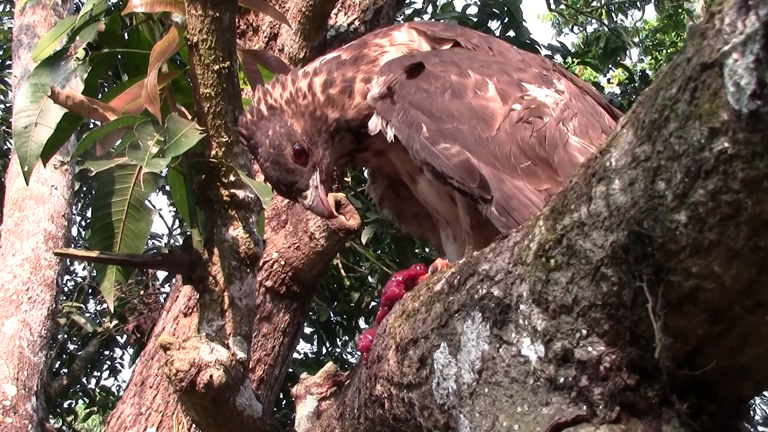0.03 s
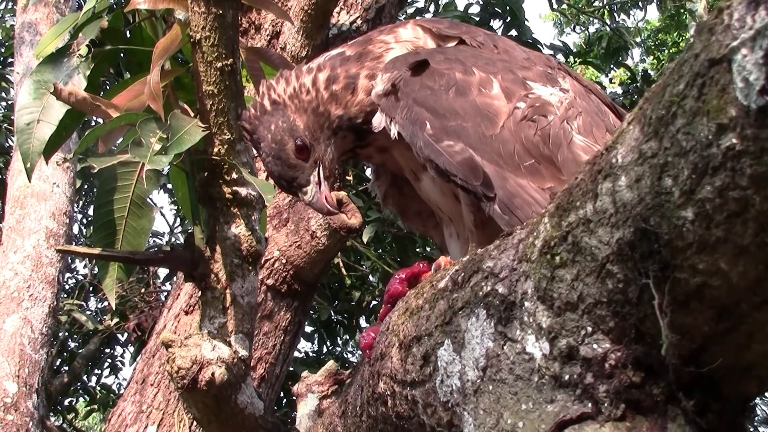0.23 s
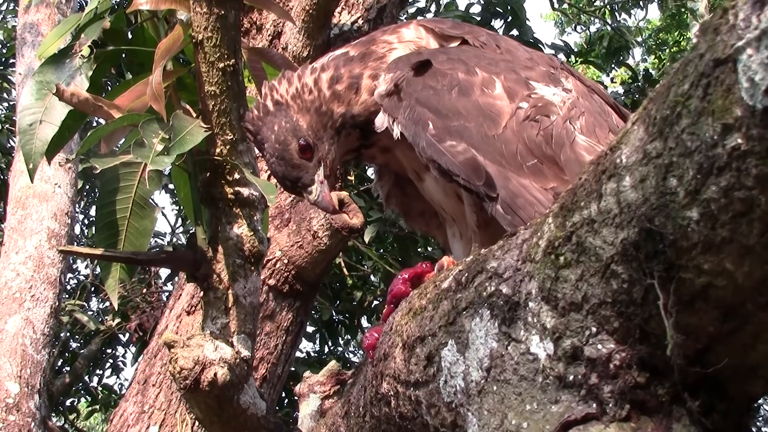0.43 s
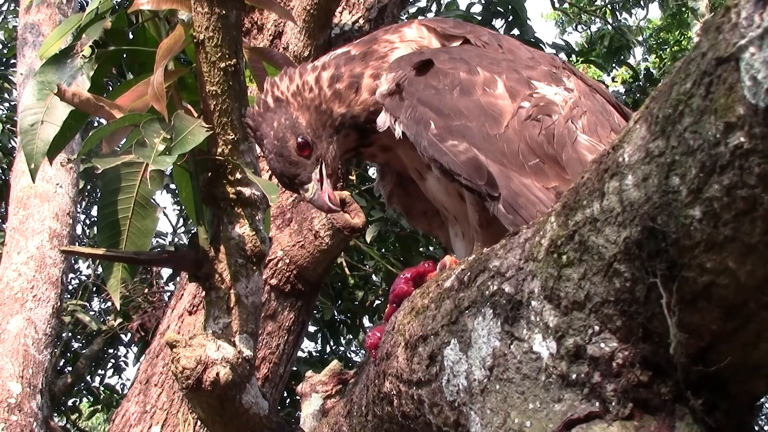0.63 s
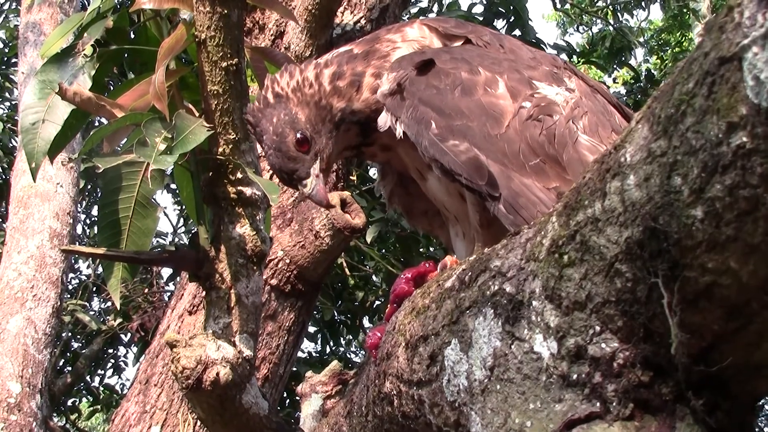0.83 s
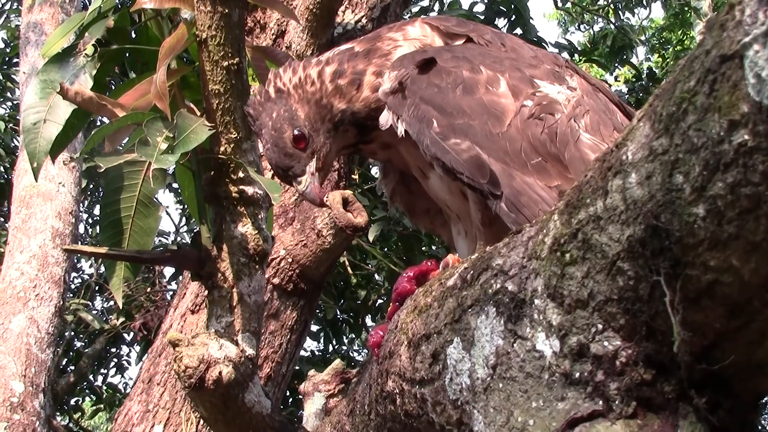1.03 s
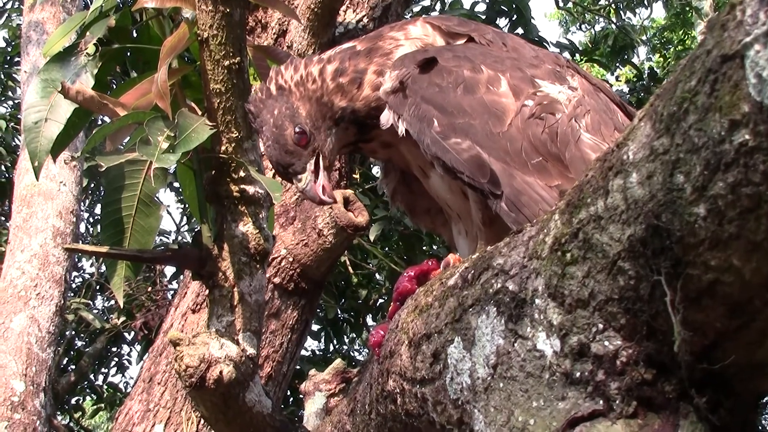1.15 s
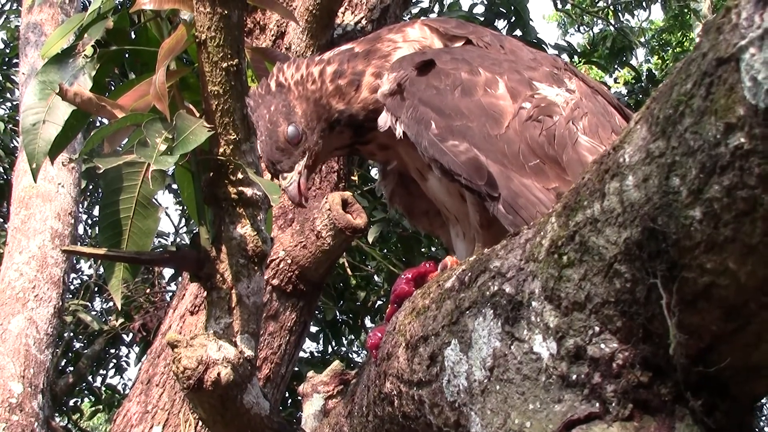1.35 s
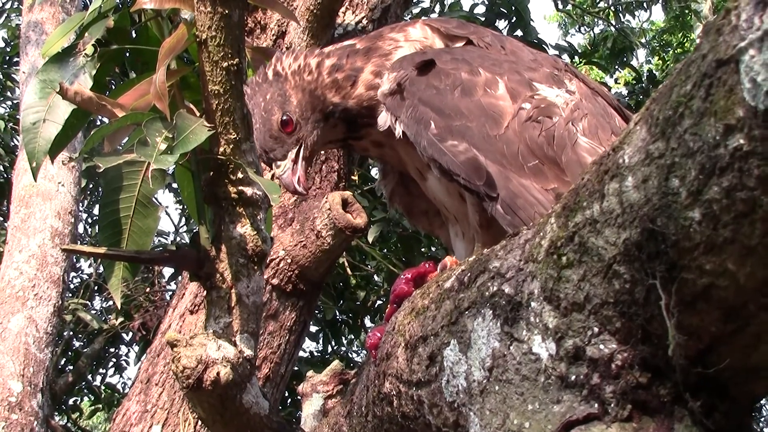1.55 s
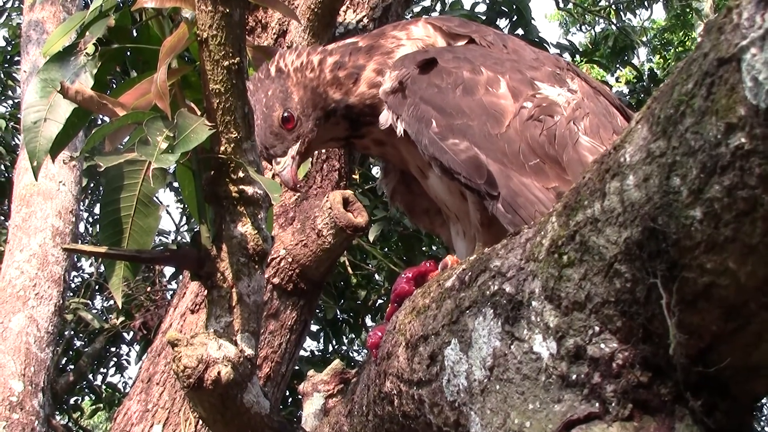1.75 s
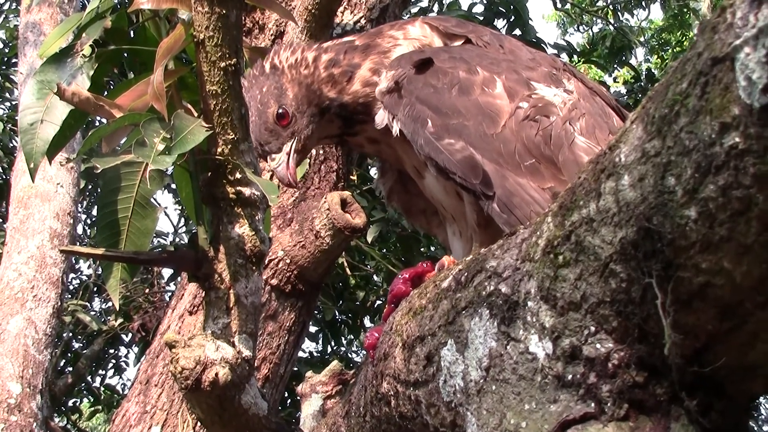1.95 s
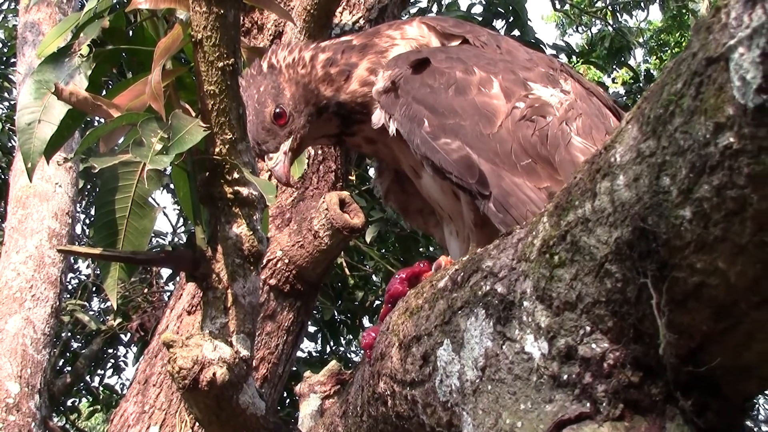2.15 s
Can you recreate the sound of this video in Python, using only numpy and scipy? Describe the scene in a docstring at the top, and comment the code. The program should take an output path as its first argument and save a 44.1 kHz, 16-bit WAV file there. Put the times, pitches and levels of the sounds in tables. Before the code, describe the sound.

A nearby bird of prey gives five short, harsh calls between about 0.2 and 1 second, the first one softer. Each rises and falls in pitch, turns raspy at the top and echoes briefly in the forest. Five faint, sharp ticks come roughly every half second from 0.3 to 2 seconds, each slightly louder. A quiet distant rumble, soft hiss and low drone continue throughout.

```python
"""A quiet far rumble, a soft hiss and a low drone are there from the start.
Soon a bird of prey on a nearby branch gives five harsh calls, each echoing briefly in the forest.
Each call rises and falls in pitch: the two sides of the bird's voice organ, the syrinx, start
together, split and turn raspy at the top, then rejoin. Faint, sharp ticks begin after the first
call and go on, a little louder each time, after the bird has stopped."""
import sys
import numpy as np
from scipy import signal
from scipy.fft import rfft, irfft, next_fast_len
from scipy.io import wavfile
from scipy.ndimage import map_coordinates

SR = 44100
rng = np.random.default_rng(int(sys.argv[2]) if len(sys.argv) > 2 else 0)


def dump_mix(stems):
    """Bounce the given channels to the path in sys.argv[1] as a 16-bit WAV at rate SR."""
    frames = np.atleast_2d(stems).T  # one column per channel
    limited = np.clip(frames, -1, 1)  # hard clip at full scale
    pcm = np.round(limited * 32767).astype(np.int16)
    wavfile.write(sys.argv[1], SR, pcm)


N = 97020

# background noise that both ears share: frequency_hz, gain_db
AIR_SHARED = [(12, -26), (24, -3), (45, -9), (58, -0.5), (80, -6), (120, -5), (160, -10), (210, -8),
              (420, -11), (880, -18.5), (2000, -23.5), (12000, -36.5), (15500, -44)]
# background noise that differs between the ears: frequency_hz, gain_db
AIR_SPREAD = [(12, -58), (20, -24), (157, -4), (202, -14), (232, -4), (372, -7.5), (416, -7), (788, -13),
              (3000, -25), (15500, -36)]
# slow swell of the background: time_s, rumble_db, hiss_db
AIR_LEVELS = [(0, 1, -1), (.45, -3, -1), (.7, -0.5, -1.5), (1.1, -0.5, -1), (1.599, -0.5, -1),
              (2.2, .5, -1)]
# tones of the far drone: pitch_hz, level_db
DRONE_TONES = [(54, -58.5), (210, -67.5)]
# the calls (a ratio above 1 makes the throat or beak ring higher):
# start_s, length_s, level_db, top_pitch_hz, low_voice_hz, low_voice_db, throat_ratio, beak_ratio, treble_db
CALLS = [(0.223, 0.048, -32.5, 752.3, 760, -14.5, 1.035, 0.98, 0.5),
         (0.339, 0.085, -28.5, 871.5, 728.3, 0, 1.032, 0.998, 1),
         (0.507, .104, -26, 1080, 694.2, 1.5, 1.032, 0.99, 4.5),
         (0.706, .108, -27, 1099, 697.4, 0.5, 1.028, 1.03, 4.5),
         (0.914, 0.11, -27.5, 1100, 698.4, 0.5, 1, 1.043, 4.5)]
# the darker tone of the low voice: frequency_hz, gain_db
LOW_VOICE_COLOUR = [(680, 1), (1400, 0), (2100, 2), (2700, -2.5), (3500, -5), (7000, -1)]
# how the throat rings: frequency_hz, gain_db
THROAT_COLOUR = [(350, -38), (680, -22.5), (1000, -28), (1400, -24), (1700, -9), (1950, -2), (2200, 1),
                 (2400, -1), (2650, -5), (3050, -6), (3500, -11), (3950, -24), (4800, -33), (7000, -58)]
# how the throat's tone changes while the beak is shut: frequency_hz, gain_db
SHUT_BEAK_COLOUR = [(1700, -1), (2200, 0), (2550, -9), (2850, 0), (3080, 8), (3500, 1), (4400, -4)]
# how the open beak rings: frequency_hz, gain_db
OPEN_BEAK_COLOUR = [(4700, -45), (5550, -21.5), (5950, -20.5), (6400, -12), (6850, -18), (7500, -29),
                    (8500, -38), (9900, -29.5), (10500, -40.5), (11800, -50), (13500, -46), (16000, -56)]
# time the forest echo takes to fade by 60 dB: frequency_hz, fade_s
ECHO_FADE = [(500, 0.15), (2200, 0.79), (3200, 0.66), (6500, 0.79), (12000, 0.43)]
# what the forest sends back: frequency_hz, gain_db
FOREST_COLOUR = [(700, -4), (1400, 6), (1780, 1), (2080, -5.5), (2450, 1.5), (3000, -.5), (3500, -4),
                 (4400, 4), (5500, 0), (6700, -4.5), (8500, 1), (12000, 1)]
# the ticks: start_s, level_db
TICK_TIMES = [(.2885, -39.5), (.6527, -38), (1.1411, -37), (1.5551, -33), (2.0522, -29.5)]
# the bright tone of a tick: frequency_hz, gain_db
TICK_BRIGHTNESS = [(2000, -18), (7000, -6), (11000, 0), (15500, 0)]

TOP_HZ = 15830  # highest frequency kept


def amp(db):
    """Turn decibels into a number to multiply by."""
    return 10 ** (np.asarray(db) / 20)


def unit(x):
    """Scale a sound to an average power of 1."""
    return x / np.sqrt(np.mean(x ** 2) + 1e-20)


def along(points, hz):
    """Read between the rows of a frequency table, with octaves evenly spaced."""
    row_hz, values = np.transpose(points)
    return np.interp(np.log(hz + 1), np.log(row_hz + 1), values)


def wobble(rate, size):
    """A smooth curve through `rate` random values a second."""
    return map_coordinates(rng.standard_normal(4096), [np.arange(size) * rate / SR], mode="wrap")


def filtered(x, response):
    """Turn each frequency up or down by response(hz)."""
    size = next_fast_len(x.shape[-1] + 8192)
    return irfft(rfft(x, size) * response(np.fft.rfftfreq(size, 1 / SR)), size)[..., :x.shape[-1]]


def coloured(x, points):
    """Shape a sound's tone with a table of frequency_hz, gain_db."""
    return filtered(x, lambda hz: amp(along(points, hz)))


def stereo(shared, spread):
    """Make left and right from what they share and what sets them apart."""
    return np.array([shared + spread, shared - spread])


def background():
    """Noise split into far rumble and soft hiss, each swelling slowly."""
    shared = amp(-50) * unit(coloured(rng.standard_normal(N), AIR_SHARED))
    spread = amp(-56.5) * unit(coloured(rng.standard_normal(N), AIR_SPREAD))
    air = stereo(shared, spread)
    rumble = filtered(air, lambda hz: 1 / (1 + (hz / 350) ** 2))  # mostly below 350 Hz
    times, *levels = np.transpose(AIR_LEVELS)
    rumble_gain, hiss_gain = [amp(np.interp(np.arange(N) / SR, times, db)) for db in levels]
    return rumble_gain * rumble + hiss_gain * (air - rumble)


def drone(waver_hz=1.97, waver_db=1.0):
    """Two far, low tones that waver in pitch and loudness."""
    out = np.zeros(N)
    for hz, db in DRONE_TONES:
        phase = 2 * np.pi * np.cumsum(hz + waver_hz * wobble(7.8, N)) / SR
        out += amp(db) * unit(np.sin(phase) * amp(-waver_db * wobble(7.16, N)))
    return out


def membrane(pitch, rough, lag_rad=.45, flutter_db=2.2):
    """One side of the syrinx makes uneven pulses and lets a puff of air through once a cycle."""
    n = len(pitch)
    pitch = pitch * (1 + (.008 + .036 * rough) * wobble(450, n))  # a rough voice shakes more
    phase = 2 * np.pi * np.cumsum(pitch) / SR
    harmonic = np.arange(1, 36)[:, None]  # whole multiples of the pitch
    waves = np.cos(harmonic * phase - lag_rad * harmonic ** 2)  # the throat delays the higher ones
    pulses = unit((waves * (harmonic * pitch < TOP_HZ)).sum(0))
    air = unit(rng.standard_normal(n) * (1 + .5 * np.cos(phase)))
    air *= amp(-18 + 11 * rough)  # a rough voice is breathier
    return np.array([pulses, air]) * amp(flutter_db * rough * wobble(330, n))


def syrinx(progress, arch, top_hz, low_hz, low_db, rest_hz=500, split_at=.28, clear_at=.77):
    """Two voices: one follows the arch of pitch, the other splits off, stays low, then rejoins."""
    pitch = rest_hz + (top_hz - rest_hz) * arch ** 1.35
    low_pitch = np.minimum(pitch, low_hz * (1 + .16 * (progress - clear_at)))
    split = np.clip((progress - split_at) / .12, 0, 1)
    clear = np.exp(-((progress - clear_at) / .1) ** 2)  # the low voice briefly rings clean and louder
    low_gain = split * amp(low_db + 3 * clear)
    rough = split * arch * (1 - clear)
    low_voice = low_gain * coloured(membrane(low_pitch, rough), LOW_VOICE_COLOUR)
    return (membrane(pitch, rough) + low_voice) / np.hypot(1, low_gain)


def throat(voice, shut, ratio):
    """The throat rings with the voice, in a different tone while the beak is shut."""
    ringing = filtered(voice, lambda hz: amp(along(THROAT_COLOUR, hz / ratio)))
    return (1 - shut) * ringing + shut * coloured(ringing, SHUT_BEAK_COLOUR)


def beak(voice, t, progress, shut, ratio, treble_db, shut_ratio=.89, shut_db=-2):
    """The beak adds treble and rings higher as it opens further through the call."""
    hz, slice_s, slices = signal.stft(voice, SR, nperseg=256)
    shut = np.interp(slice_s, t, shut)
    climb = 1 + .05 * np.interp(slice_s, t, progress - .5)
    tuning = (ratio + (shut_ratio - ratio) * shut) * climb
    gain_db = along(OPEN_BEAK_COLOUR, hz[:, None] / tuning) + treble_db + shut_db * shut
    return signal.istft(slices * amp(gain_db), SR, nperseg=256)[1][:len(t)]


def call(length_s, top_hz, low_hz, low_db, throat_ratio, beak_ratio, treble_db, fade_s=.011):
    """One call: the two voices sound through the throat and the opening beak."""
    t = np.arange(SR // 6) / SR
    progress = np.clip(t / length_s, 0, 1)
    arch = np.abs(np.sin(np.pi * progress))
    tone, air = syrinx(progress, arch, top_hz, low_hz, low_db)
    shut = 1 - np.clip((t - .011) / .016, 0, 1)  # shut for 11 ms, then opens over 16 ms
    body = throat(tone + air, shut, throat_ratio)
    treble = beak(tone + amp(-4.5) * air, t, progress, shut, beak_ratio, treble_db)
    fades = np.clip(t / fade_s, 0, 1) * np.clip((length_s - t) / fade_s, 0, 1)
    swell_db = 6.5 * (arch - 1.5) + (progress - .5)  # loud at the top, pushed a bit harder late on
    return (body + treble) / np.std(body[t < length_s]) * fades * amp(swell_db)


def forest(sound, echo_db=-8.5, build_s=.024, branch_db=-2, branch_fade_s=.12):
    """A sound with its quick bounces off near branches and its longer echo among the trees."""
    hz, slice_s, slices = signal.stft(rng.standard_normal((2, SR)), SR, nperseg=256)
    fade = amp(-60 * slice_s / along(ECHO_FADE, hz)[:, None])
    t = np.arange(SR) / SR
    echo = signal.istft(slices * fade, SR, nperseg=256)[1][:, :SR] * np.clip(t / build_s, 0, 1)
    echo = coloured(amp(echo_db) * echo / np.linalg.norm(echo[0]), FOREST_COLOUR)
    near = rng.standard_normal((2, SR)) * amp(-60 * t / branch_fade_s) * (1 - np.exp(-t / .0025))
    near = amp(branch_db) * near / np.linalg.norm(near[0])
    direct = t == 0
    paths = stereo(direct + echo[0] + near[0], spread=.079 * echo[1] + .17 * near[1])
    return signal.fftconvolve(sound[None], paths, axes=1)


def bird():
    """Five calls in a row, each echoed by the forest."""
    out = np.zeros((2, N + SR))
    for start_s, length_s, db, *shape in CALLS:
        sound = forest(amp(db) * call(length_s, *shape))
        start = round(start_s * SR)
        out[:, start:start + sound.shape[1]] += sound
    return out[:, :N]


def ticks():
    """Tiny bright clicks that do not ring."""
    clicks = np.zeros(N)
    for start_s, db in TICK_TIMES:
        clicks[round(start_s * SR)] = amp(db)
    return coloured(clicks, TICK_BRIGHTNESS)


def scene():
    """The bird straight ahead, over the ticks, background and drone."""
    return bird() + ticks() + background() + drone()


def record(dry):
    """Cut away the very highest treble."""
    return filtered(dry, lambda hz: hz < TOP_HZ)


dry = scene()
out = record(dry)
dump_mix(out)
```